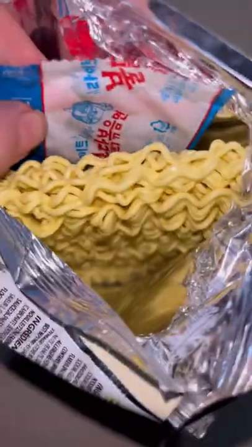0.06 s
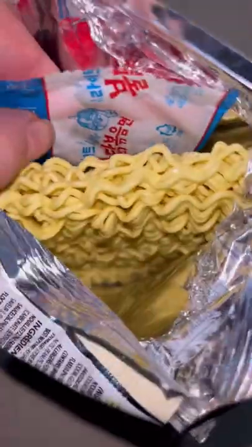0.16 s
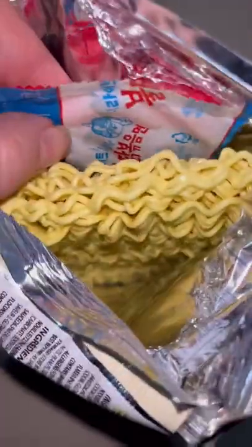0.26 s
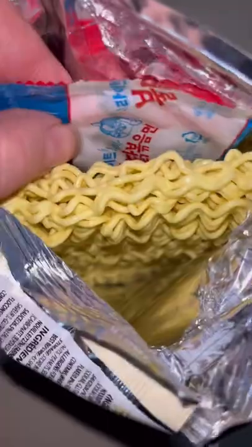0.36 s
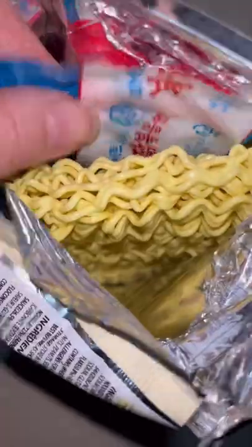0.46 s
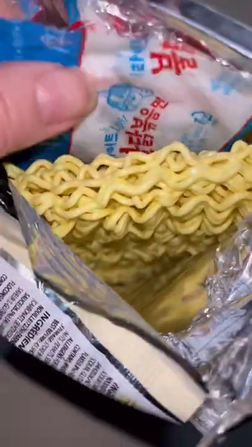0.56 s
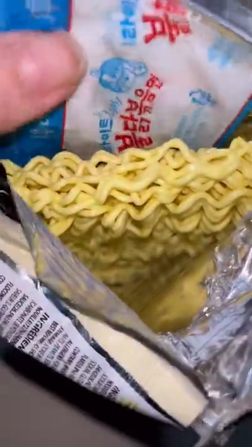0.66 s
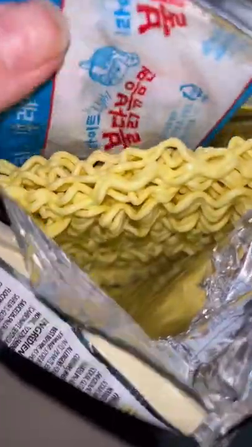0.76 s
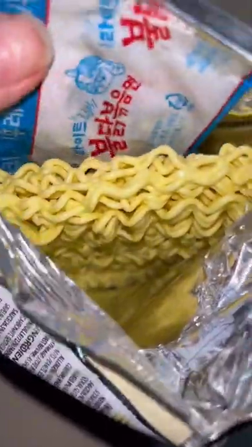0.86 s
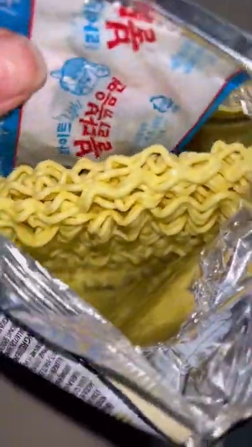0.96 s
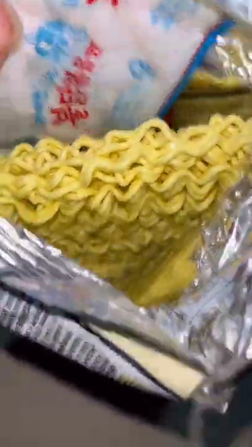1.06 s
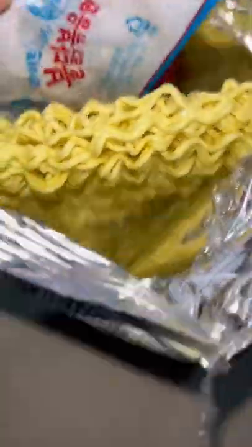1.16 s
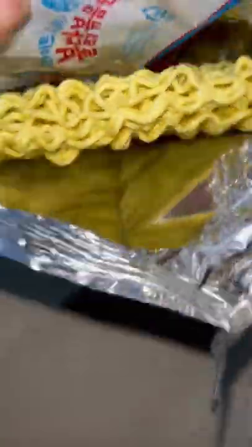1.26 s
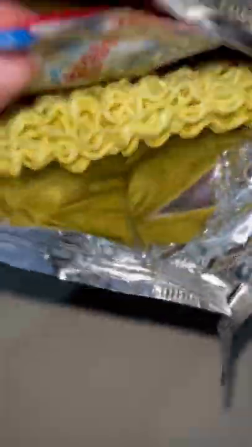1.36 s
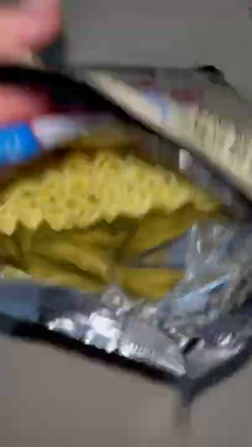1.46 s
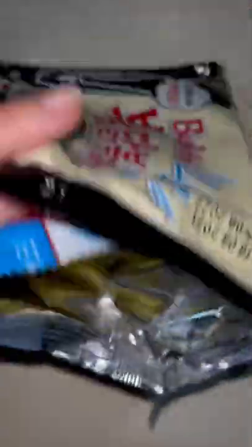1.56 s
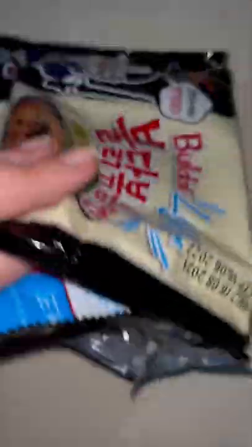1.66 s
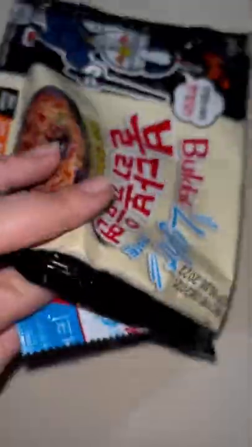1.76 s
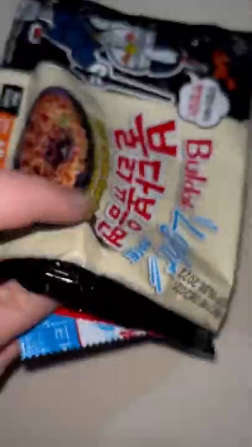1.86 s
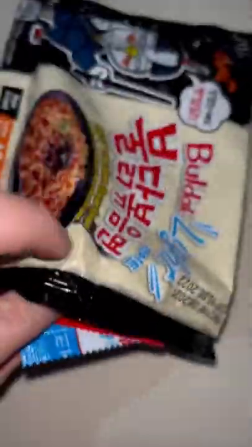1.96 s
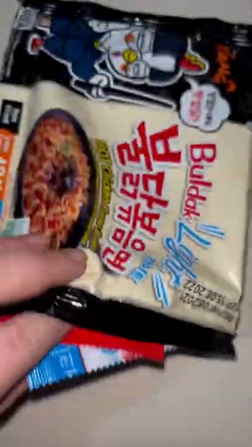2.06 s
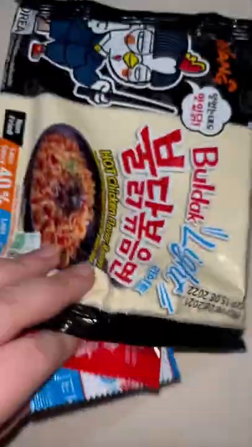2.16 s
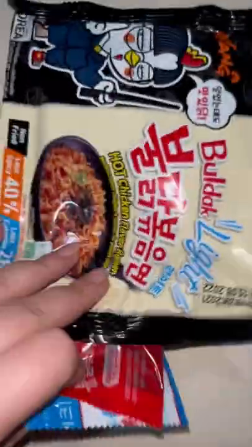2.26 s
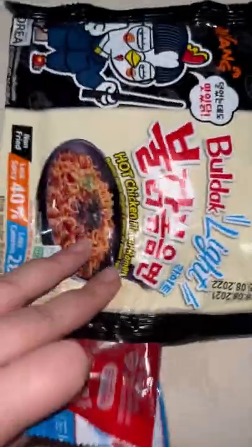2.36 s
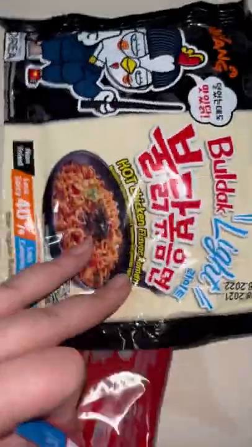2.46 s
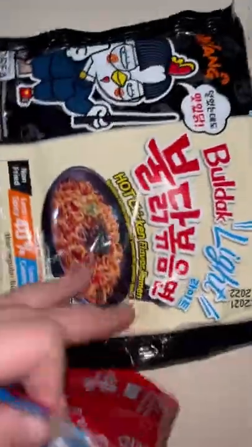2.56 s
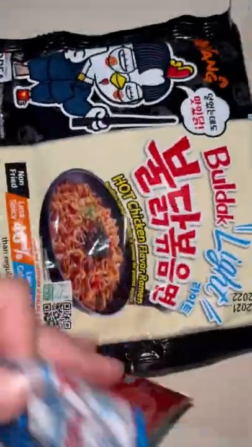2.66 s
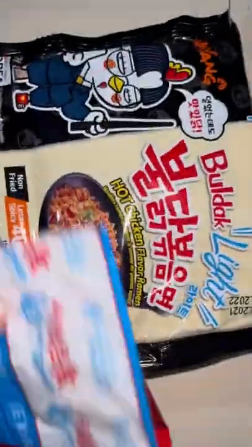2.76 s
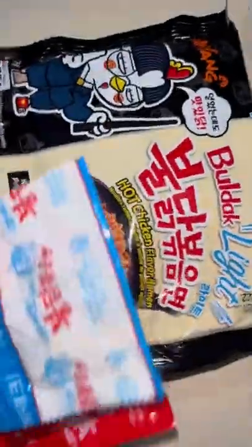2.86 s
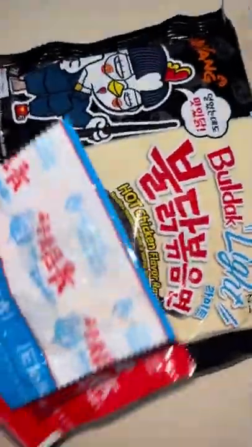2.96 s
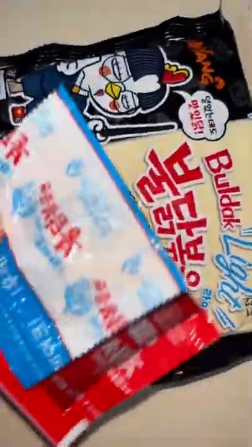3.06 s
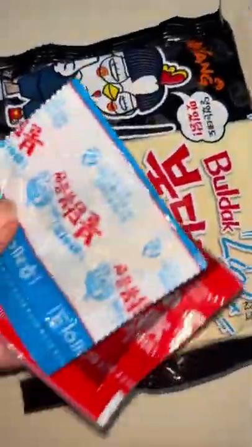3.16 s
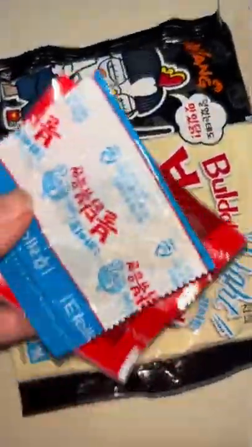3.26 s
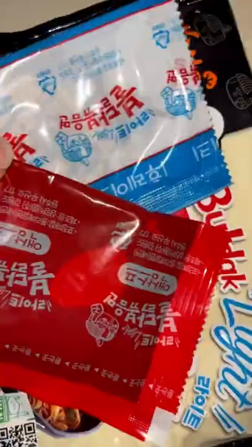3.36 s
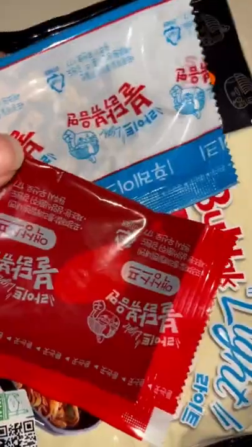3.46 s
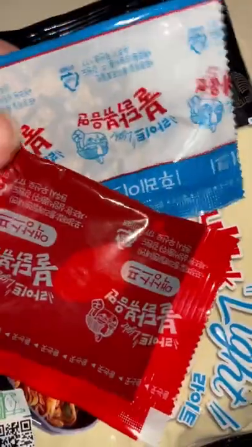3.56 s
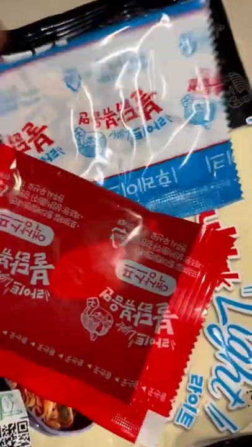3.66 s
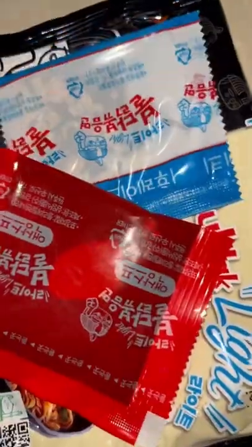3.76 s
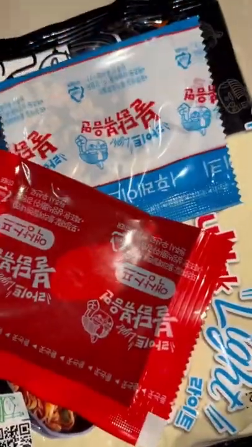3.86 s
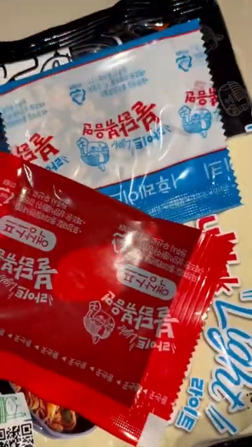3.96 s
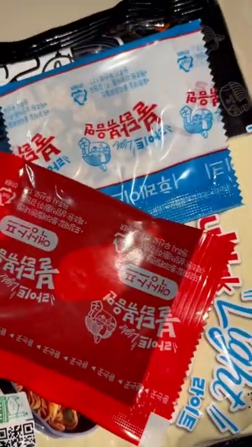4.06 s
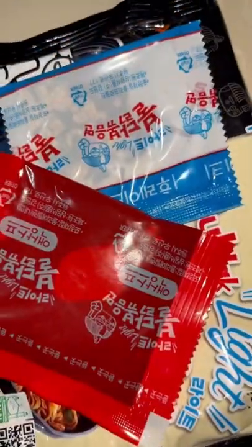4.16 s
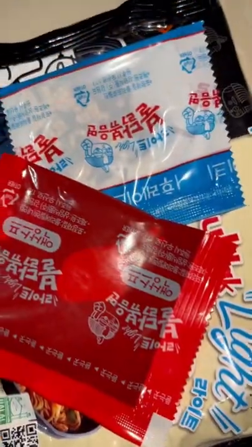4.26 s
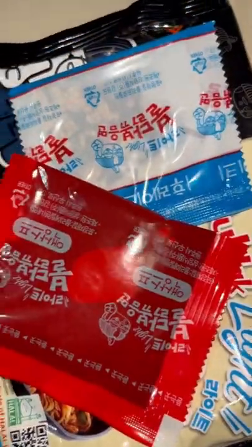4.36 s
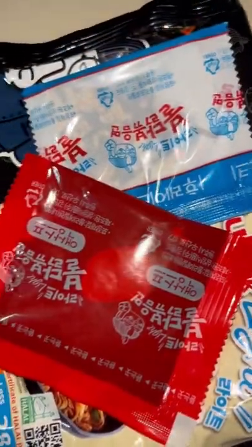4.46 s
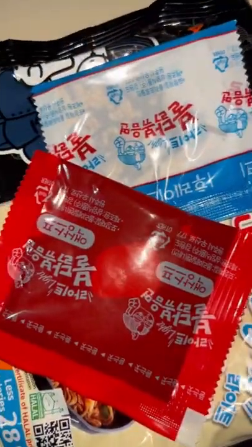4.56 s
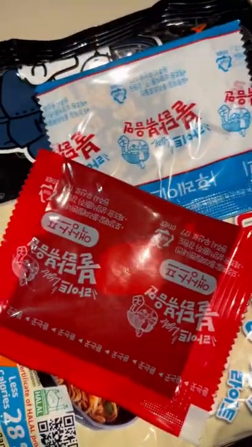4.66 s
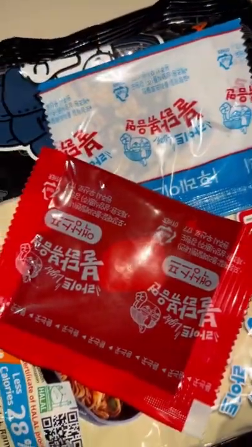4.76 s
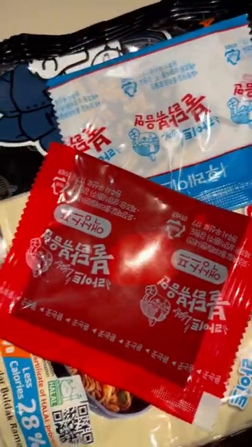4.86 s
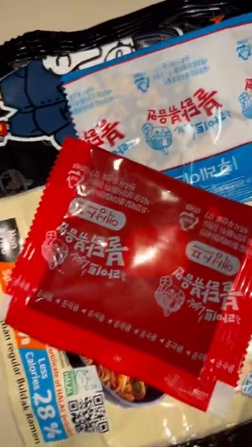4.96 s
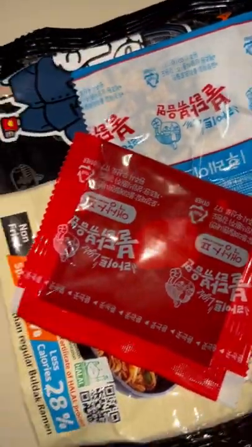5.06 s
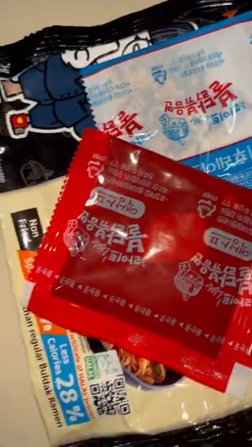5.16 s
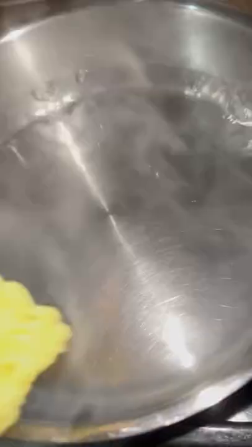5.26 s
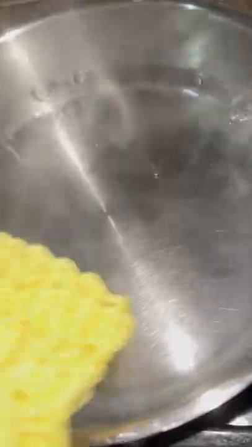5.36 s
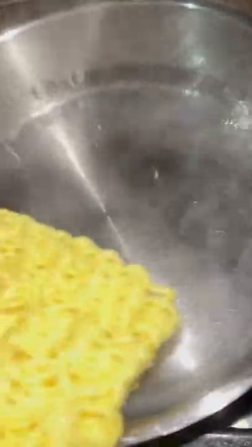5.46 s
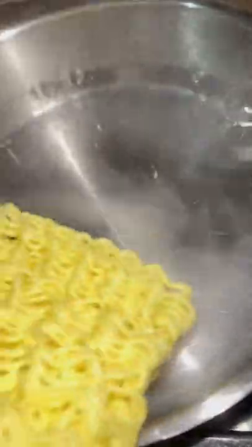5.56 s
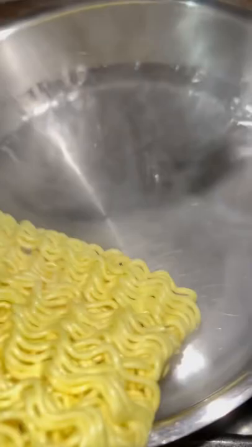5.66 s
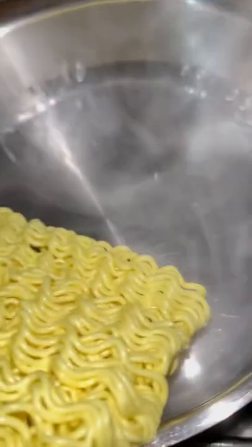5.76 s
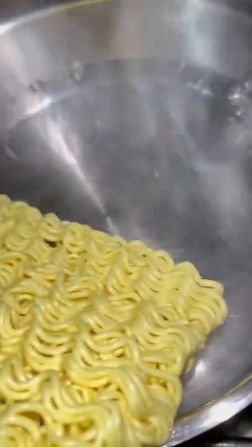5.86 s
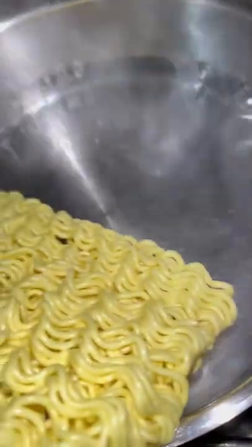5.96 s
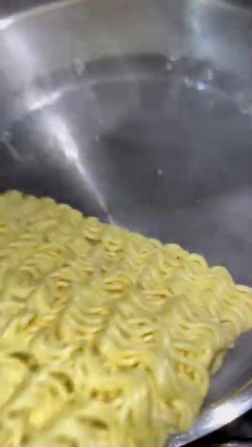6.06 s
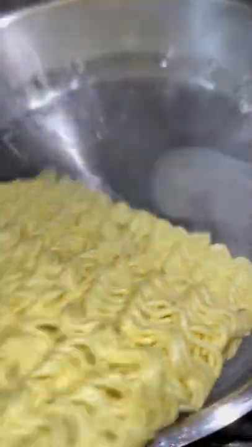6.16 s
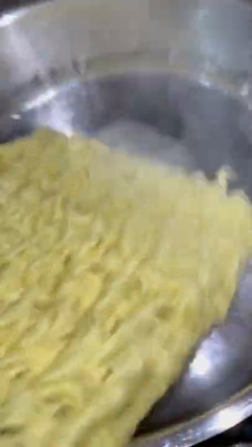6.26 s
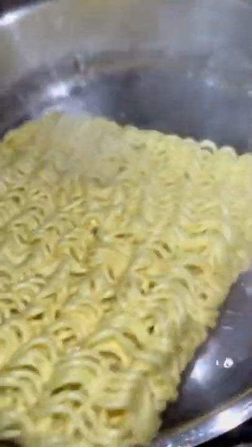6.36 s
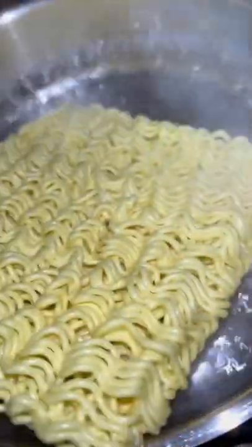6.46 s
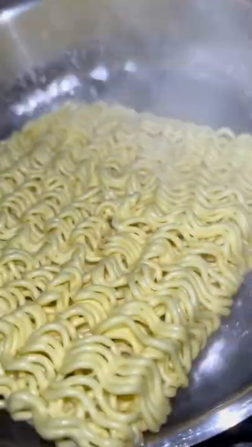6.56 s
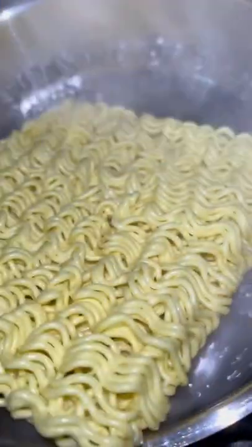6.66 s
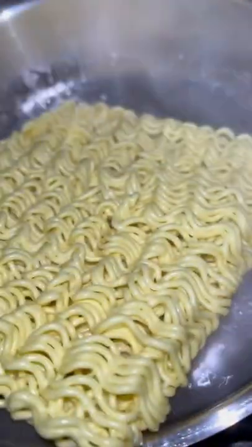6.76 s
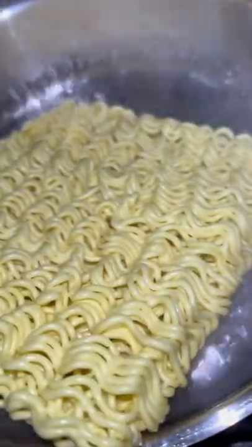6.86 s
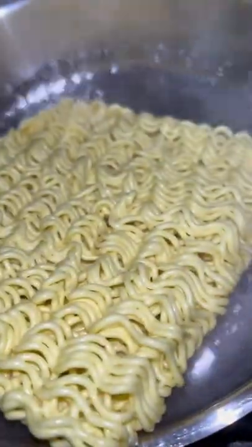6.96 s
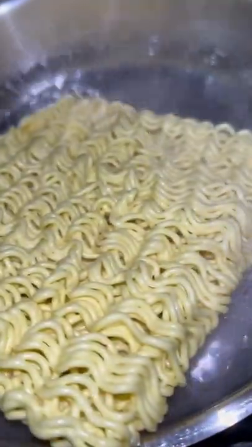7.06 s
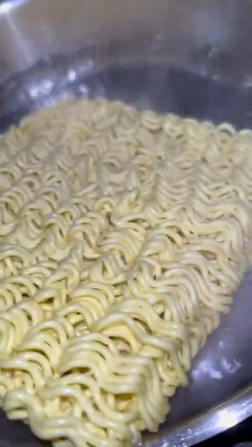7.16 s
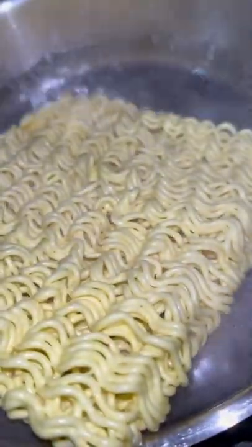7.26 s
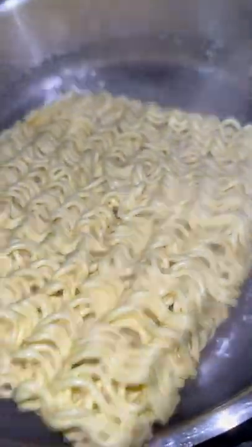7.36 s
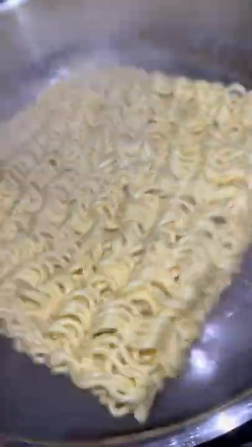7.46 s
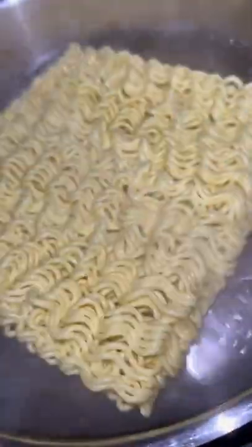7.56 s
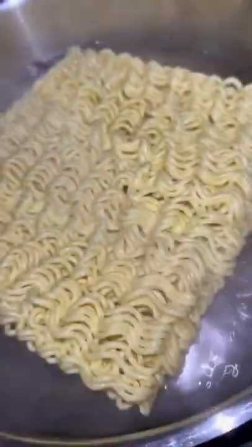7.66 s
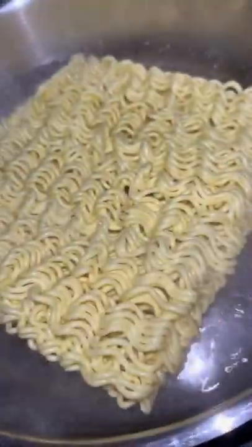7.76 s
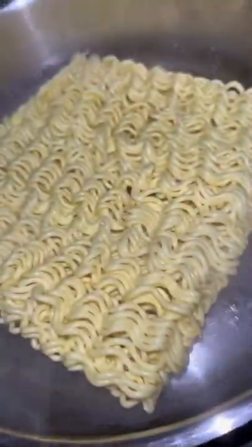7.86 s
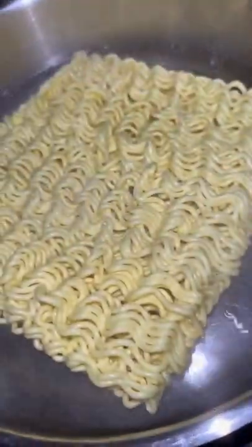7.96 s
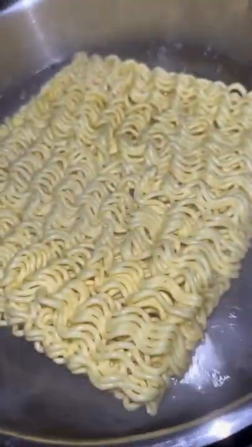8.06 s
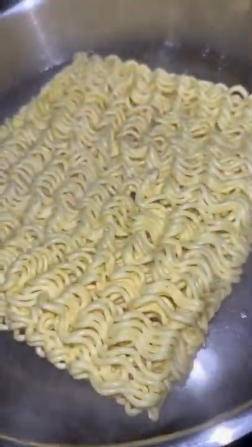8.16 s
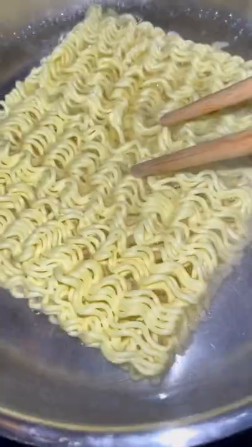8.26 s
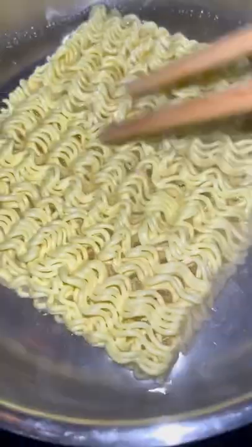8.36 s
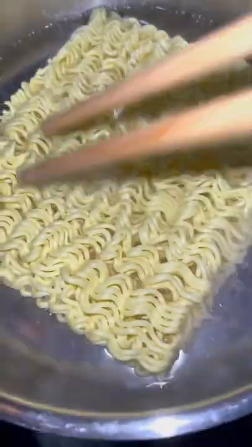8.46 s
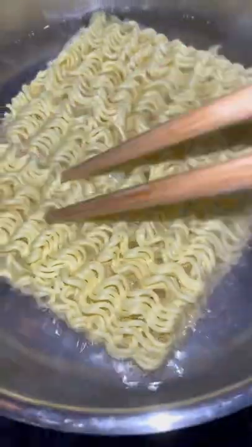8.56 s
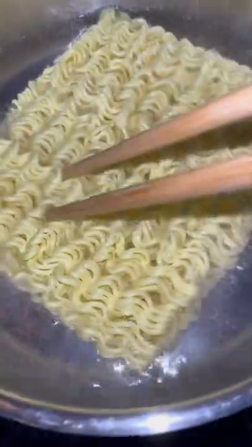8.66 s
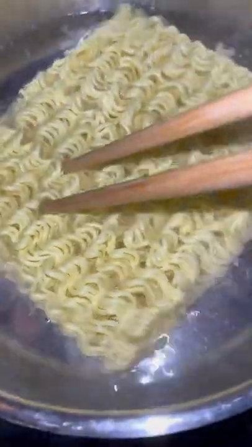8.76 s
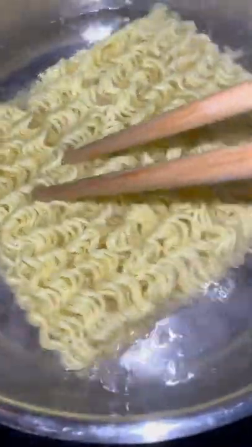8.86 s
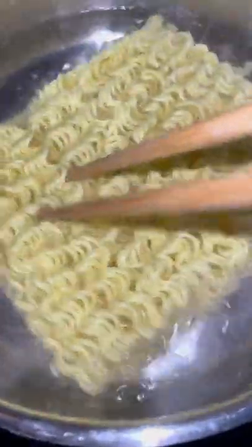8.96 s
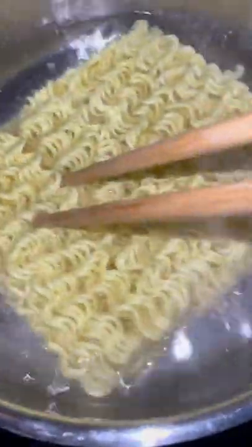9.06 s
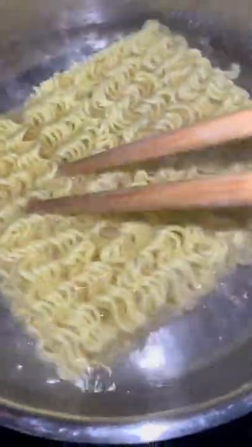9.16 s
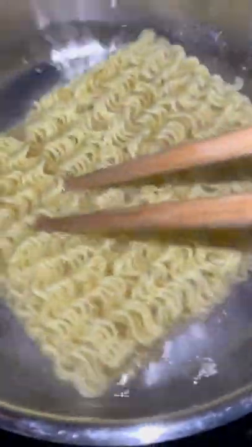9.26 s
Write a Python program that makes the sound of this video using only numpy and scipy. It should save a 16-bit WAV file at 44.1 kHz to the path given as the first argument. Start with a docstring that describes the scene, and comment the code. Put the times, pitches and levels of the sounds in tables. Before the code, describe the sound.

A foil-plastic packet crackles and snaps close up, goes quiet, then abruptly a pot simmers, noodles bump the steel, water sizzles and wooden chopsticks click.

```python
"""A foil-plastic noodle packet is handled close to the microphones: the film snaps, crackles and flexes,
and two sachets are dropped on it. Then, abruptly, a steel pot simmers on a gas ring: the noodle block is
pushed in and bumps the pot, water sizzles on the hot wall, and wooden chopsticks click together.
Film and clicks are filtered grains and noise bursts, pot and bubbles decaying modes, flame and water
coloured noise; a small kitchen answers, and two microphone ports hear it with a phase difference."""
import sys
import numpy as np
from scipy import signal
from scipy.fft import rfft, irfft, next_fast_len
from scipy.io import wavfile

SR = 44100
rng = np.random.default_rng(int(sys.argv[2]) if len(sys.argv) > 2 else 0)


def file_out(sig):
    """Save sig as 16-bit WAV at sys.argv[1]."""
    # one column per channel
    cols = np.atleast_2d(sig).T
    # limit, then scale
    lim = np.clip(cols, -1, 1)
    pcm = np.round(lim * 32767).astype(np.int16)
    wavfile.write(sys.argv[1], SR, pcm)


N = 411012
TIME = np.arange(N) / SR
STOVE_ON_S = 5.326

# Bright colour of the film, lent to every click too. Each row: frequency in Hz, relative level in dB per Hz.
FILM_FINE = [(1500, -28.5), (2800, 6.5), (3800, 1), (5300, 1), (7000, -6.5), (10000, 0.5), (12000, -11.5),
             (14000, -38), (16000, -32)]
# Lower colour of wider film facets popping. Each row: frequency in Hz, relative level in dB per Hz.
FILM_COARSE = [(350, -13.5), (650, 0.5), (1000, 3), (1800, -1.5), (2600, -2), (4000, -27.5)]
# Hiss of the simmering water. Each row: frequency in Hz, relative level in dB per Hz.
SIMMER_COLOUR = [(300, -5.5), (550, 0), (900, 2.5), (1300, 2), (1750, 2), (2200, -6), (3300, -3.5),
                 (5000, -5), (7000, -5), (10000, 1), (11500, -6), (13300, -36), (14500, -17), (15600, -9),
                 (16300, -45)]
# Modes of the filled pot: two of rocking, two booming, then the steel wall.
# Each row: nominal frequency in Hz, relative level in dB, 60 dB decay time in s.
POT_MODES = [(68.5, -4.5, .2), (100, -8, .15), (215.7, -4, .24), (278, -12, .2), (356, -13, 0.09),
             (485, -9, 0.11), (753, -3.5, 0.034), (913, -3, 0.08), (1135, -4, 0.085), (1350, -9, 0.09),
             (1740, -6, 0.049), (2100, -7, 0.045), (8210, -5.5, 0.056)]


def from_db(db):
    """Decibels as an amplitude gain."""
    return 10 ** (np.asarray(db) / 20)


def rms_one(x):
    """Scale a signal to an rms of 1."""
    return x / np.sqrt(np.mean(x ** 2) + 1e-20)


def add(track, s, sound):
    """Mix a sound in from time s."""
    start = max(round(s * SR), 0)
    track[start:start + len(sound)] += sound[:N - start]


def gains_in_time(rows):
    """Rows of (s, dB, ..): one interpolated gain curve per dB column."""
    s, *columns = np.transpose(rows)
    return [from_db(np.interp(TIME, s, c)) for c in columns]


def strokes(rows, attack_s, release_db_per_s):
    """Rows of (s, hold s, dB, ..): each swells, holds and dies away. One gain curve per dB column."""
    power = 0
    for s, hold, *levels in rows:
        swell = np.clip((TIME - s) / attack_s, 0, 1)
        release = from_db(-np.clip(release_db_per_s * (TIME - s - hold), 0, 120))
        power = power + np.outer(from_db(levels), swell * release) ** 2
    return np.sqrt(power)


def flicker(per_s, db):
    """A gain that wanders at random."""
    steps = rng.normal(0, db, int(per_s * N / SR) + 2)
    return from_db(np.interp(TIME * per_s, np.arange(len(steps)), steps))


def at_hz(points, hz):
    """Read a (Hz, dB) curve along a logarithmic frequency axis."""
    points = np.array(points)
    return np.interp(np.log(hz + 1), np.log(points[:, 0]), points[:, 1])


def coloured(x, spectrum):
    """Causal (minimum-phase) filter with the given spectrum; rms 1."""
    size = 2 * next_fast_len(len(x) // 2 + 1024)
    gain = from_db(at_hz(spectrum, np.fft.rfftfreq(size, 1 / SR)))
    # folding the cepstrum onto positive times makes the phase minimum
    cepstrum = irfft(np.log(gain))
    cepstrum[1:size // 2] *= 2
    cepstrum[size // 2 + 1:] = 0
    response = np.exp(rfft(cepstrum))
    return rms_one(irfft(rfft(x, size) * response)[:len(x)])


def resonate(x, hz, width_hz):
    """One resonance: two poles, with zeros at the bottom and top of the band."""
    r = np.exp(-np.pi * width_hz / SR)
    return signal.lfilter([1, 0, -1], [1, -2 * r * np.cos(2 * np.pi * hz / SR), r * r], x)


def resonate_twice(x, hz, width_hz):
    """The same resonance two times over, for steeper skirts."""
    return resonate(resonate(x, hz, width_hz), hz, width_hz)


def grains(per_s, spread_db, hiss_db):
    """Random clicks of uneven size over a smooth hiss."""
    sizes = from_db(spread_db * np.minimum(rng.exponential(1, N), 4)) * rng.choice([-1, 1], N)
    struck = rng.random(N) < per_s / SR
    return rms_one(sizes * struck) + from_db(hiss_db) * rng.standard_normal(N)


def ticks(per_s, spread_db, width):
    """Tiny impulses in random clumps, each ringing briefly at one of 24 pitches."""
    count = int(per_s * N / SR)
    clump = np.sort(rng.uniform(0, N, count // 3 + 1))
    at = (clump[np.arange(count) // 3] + rng.exponential(.003 * SR, count)).astype(int) % N
    sizes = from_db(spread_db * np.minimum(rng.exponential(1, count), 3)) * rng.choice([-1, 1], count)
    pitches = np.geomspace(600, 12500, 24)
    dealt = rng.integers(0, len(pitches), count)
    out = np.zeros(N)
    faint = 1e-12 * (np.arange(N) % 64 == 0)   # keeps the filters from falling fully silent
    for k, hz in enumerate(pitches):
        own = np.bincount(at[dealt == k], sizes[dealt == k], N)
        out += np.sqrt(hz) * rms_one(resonate(own + faint, hz, width * hz))
    return rms_one(out)


def burst(t60, tail_db, tail_t60):
    """A shiver of noise that builds in about a millisecond and leaves a weaker, longer tail."""
    t = TIME[:SR // 10]
    rise = 1 - np.exp(-(t / .0006) ** 2)
    decay = from_db(-60 * t / t60) + from_db(tail_db - 60 * t / tail_t60)
    return rng.standard_normal(len(t)) * rise * decay


def clicks(rows, crack_t60, pop_t60, crack_width, pop_width, tail_db, tail_t60,
           ring_share, skim_share, bend):
    """Each click is a bright crack with a brief ring, a lower pop, and a dull body as far as it is bent.

    Crack and pop levels are set on the first 5 ms, ahead of the high-pass."""
    ring_t60, ring_spread_oct = .0045, .25
    skim_s = (.0003, .0011)   # delay range of the first reflection off a surface close by
    facet_cut = .58   # a facet radiates little below this share of its pop pitch
    out, head, t = np.zeros(N), SR // 200, TIME[:SR // 10]
    for s, crack_db, crack_hz, pop_db, pop_hz in rows:
        crack = resonate(burst(crack_t60, tail_db, tail_t60), crack_hz, crack_width * crack_hz)
        crack = coloured(crack, FILM_FINE)
        ring_hz = min(crack_hz * 2 ** rng.normal(0, ring_spread_oct), 9500)
        ring = np.sin(2 * np.pi * ring_hz * t) * from_db(-60 * t / ring_t60)
        ring *= 1 - np.exp(-(t / .0004) ** 2)
        # the first instant spans all pitches
        edge = from_db(-16) * rms_one(burst(crack_t60 / 2, tail_db, tail_t60))
        crack = crack + ring_share * coloured(ring, FILM_FINE) + edge
        crack += skim_share * np.roll(crack, int(rng.uniform(*skim_s) * SR))

        pop = resonate_twice(burst(pop_t60, tail_db, tail_t60), pop_hz, pop_width * pop_hz)
        pop = coloured(pop, FILM_COARSE)

        facet = from_db(crack_db) * crack / np.std(crack[:head])
        facet = facet + from_db(pop_db) * pop / np.std(pop[:head])
        high_pass = signal.butter(4, facet_cut * pop_hz, "high", fs=SR, output="sos")
        facet = signal.sosfilt(high_pass, facet)

        body = coloured(resonate(burst(pop_t60, tail_db, tail_t60), hz=650, width_hz=530), FILM_COARSE)
        body_gain = min(bend[int(s * SR) + head], 1) ** 2 * from_db(pop_db - 6.0)
        add(out, s, facet + body_gain * body / np.std(body[:head]))
    return out


def plops(rows, t60, climb):
    """A bursting bubble rings and rises in pitch."""
    out, t = np.zeros(N), TIME[:SR // 10]
    for s, db, hz in rows:
        rising = np.sin(2 * np.pi * hz * t * (1 + climb * t / t60))
        add(out, s, from_db(db - 60 * t / t60) * rising)
    return out


def room_tone():
    """The quiet room: steady noise, strongest in the bass."""
    # Colour of the room. Each row: frequency in Hz, relative level in dB per Hz.
    room_colour = [(25, -21), (70, -1), (140, -4.5), (210, 0), (300, -13), (450, -25), (1000, -30),
                   (1700, -25), (2100, -37), (3300, -36), (6500, -36), (10500, -32), (12500, -49),
                   (16000, -58.5)]
    return from_db(-63.5) * coloured(rng.standard_normal(N), room_colour)


def burner():
    """A steady gas flame: low, turbulent noise."""
    # Colour of the roar. Each row: frequency in Hz, relative level in dB per Hz.
    flame_colour = [(25, -22), (50, -8.5), (75, -7.5), (105, 4), (145, -11.5), (210, -7), (245, -10),
                    (282, -5), (330, -20.5), (480, -23), (700, -67.5)]
    return from_db(-43.5) * coloured(rng.standard_normal(N), flame_colour)


def simmering(fizz):
    """Tiny bubbles on the pot floor ring over a smooth hiss."""
    surge = flicker(per_s=25, db=3)   # the bubbles come in uneven waves
    hiss = coloured(from_db(-3.5) * fizz * surge + rng.standard_normal(N), SIMMER_COLOUR)
    # the wetted block seeds more bubbles
    return hiss * from_db(np.interp(TIME, [5.9, 6.7], [-54, -51]))


def sizzling(fizz):
    """Water flashing off the hot wall: swells of dense grains and fizz."""
    # Swells of steam. Each row: peak time in s, level in dB, rise scale in s, fall scale in s.
    swells = [(5.525, -56, 0.0075, .028), (6.27, -40.5, 0.071, 0.052), (6.461, -24, 0.046, 0.076),
              (6.621, -51, 0.0087, 0.26), (7.601, -44.5, 0.09, 0.078), (8.935, -44.5, 0.03, 0.015),
              (9.208, -34, 0.025, 0.055)]
    # Colour of the sizzle. Each row: frequency in Hz, relative level in dB per Hz.
    sizzle_colour = [(500, -11.5), (900, -2), (1300, 2), (1900, -5.5), (2600, 5), (4000, 0), (7000, -2.5),
                     (10000, 4), (11500, -3.5), (13300, -27), (14100, -31), (15600, -4), (16300, -21)]
    flash = np.zeros(N)
    for s, db, rise, fall in swells:
        flash += from_db(db) / np.cosh((TIME - s) / np.where(TIME < s, rise, fall)) ** 2
    spray = grains(per_s=8200, spread_db=3.5, hiss_db=-3.0)
    return flash * coloured(spray + from_db(-7.5) * fizz, sizzle_colour)


def bubbles():
    """Bubbles burst at the surface, and a string of small ones escapes at the edge of the block."""
    # Single bursts. Each row: start in s, peak level in dB, starting pitch in Hz.
    surface = [(5.544, -42, 1880), (6.82, -34, 1660), (6.99, -35.5, 940), (5.698, -38, 2000),
               (6.9, -31, 1600)]
    # Small bubbles escaping one by one. Each row: start in s, peak level in dB.
    escaping = [(7.97, -39), (8.006, -38), (8.044, -39), (8.080, -37), (8.136, -39), (8.170, -35),
                (8.200, -34), (8.232, -33), (8.3575, -41)]
    flurry = [(s, db, 4970 * rng.uniform(0.95, 1.075)) for s, db in escaping]   # pitch in Hz
    return plops(flurry, t60=0.011, climb=.06) + plops(surface, t60=0.012, climb=0.066)


def pot_clicks():
    """Brittle noodles, spitting droplets and chopsticks: very short cracks with a lower pop."""
    # Sharp clicks. Each row: start in s, crack level in dB, crack pitch in Hz, pop level in dB, pop pitch in Hz.
    sticks = [(5.402, -51.5, 5000, -61, 1800), (5.438, -53, 7450, -59, 2400), (5.584, -62, 8700, -54, 1750),
              (6.103, -39, 6950, -42, 1840), (6.177, -34, 5900, -44, 1600), (6.795, -46, 8540, -51, 1440),
              (7.673, -44.5, 6230, -49, 2400), (8.474, -48.5, 8600, -67, 1440),
              (8.572, -28, 6700, -40, 2270), (8.5764, -24, 7000, -31.5, 2190),
              (8.5823, -40, 6210.0, -34, 795), (8.6199, -19, 8530, -33.5, 1420),
              (8.7015, -41, 8500, -64, 1380.0)]
    return clicks(sticks, crack_t60=0.0013, pop_t60=0.0062, crack_width=0.5, pop_width=1.0,
                  tail_db=-34, tail_t60=0.018, ring_share=0.24, skim_share=0, bend=np.ones(N))


def stirring():
    """The shifting block rocks the pot on its grate, sloshes an uneven boom and keeps the steel trembling."""
    # Pushes of the block. Each row: start in s, hold in s, then rocking, booming and trembling level in dB,
    # ahead of each layer's trim.
    pushes = [(5.7, 0.14, -38.5, -46.5, -44), (5.88, 0.16, -35, -52, -52),
              (6.08, 0.21, -34.5, -37.5, -37.5), (6.21, 0.19, -29.5, -35, -37.5),
              (6.44, 0.076, -33.5, -33, -36), (7.55, 0.11, -39, -35.5, -51), (8.58, 0.043, -34, -49, -66)]
    # the simmer alone moves the pot this much: rocking, booming, trembling
    idle = from_db([[-53], [-63], [-63]])
    pushed = strokes(pushes, attack_s=0.0215, release_db_per_s=99)
    rocking, booming, trembling = np.hypot(pushed, idle)
    push = grains(per_s=900, spread_db=5.0, hiss_db=-7.5)
    rock = rms_one(resonate_twice(push, hz=70, width_hz=46))
    boom, steel = np.zeros(N), np.zeros(N)
    for hz, db, _ in POT_MODES[2:4]:
        boom += from_db(db) * rms_one(resonate_twice(push, hz, 0.17 * hz))
    for hz, db, t60 in POT_MODES[4:]:
        mode = rms_one(resonate(push, hz, 1.5 / t60 + 0.035 * hz))
        steel += from_db(db) * mode * (hz / 1000) ** -.45
    rock_layer = from_db(-2.5) * rocking * rock
    steel_layer = from_db(-8.0) * trembling * rms_one(steel)
    return rock_layer + booming * rms_one(boom) + steel_layer


def bumps():
    """Each bump rocks the pot on its grate, makes it boom, and drags the brittle block over the steel."""
    # The block bumping the pot. Each row: start in s, then knock, scratch, thump and boom level in dB,
    # ahead of the trims and each mode's own level.
    contacts = [(5.697, -33.5, -52, -45, -51), (5.745, -32, -45, -40, -44), (5.805, -26.5, -52, -42, -45),
                (5.859, -34, -44.5, -36, -38), (6.114, -22, -43.5, -20, -22), (6.175, -24.5, -33, -36, -32),
                (6.227, -11, -31.5, -36, -35), (6.24, -20, -40, -13.5, -16.5), (6.260, -13, -38, -30, -30),
                (6.289, -9.5, -32, -22, -22), (6.303, -30, -42, -36, -15), (6.318, -17.5, -48, -36, -36),
                (6.373, -17.5, -32, -26, -31), (7.529, -18.5, -41, -23, -35),
                (7.538, -19.5, -33.5, -34, -35), (7.561, -23, -60, -21, -19.5)]
    detune, contact_spread_db = .018, 2   # pitch and strength vary from bump to bump
    out, t = np.zeros(N), TIME[:SR // 2]
    grit = grains(per_s=900, spread_db=5, hiss_db=-8)
    for s, knock_db, scratch_db, thump_db, boom_db in contacts:
        for k, (hz, db, t60) in enumerate(POT_MODES):
            hz = hz * (1 + rng.normal(0, detune))
            db = db + rng.normal(0, contact_spread_db)
            if k < 4:
                level = thump_db if k < 2 else boom_db
                ring = from_db(level) * np.sin(2 * np.pi * hz * t)
            else:   # the upper modes are rough: narrow noise
                rough = rms_one(resonate(rng.standard_normal(len(t)), hz, 0.039 * hz))
                ring = from_db(knock_db - 12.5) * rough
            add(out, s, ring * from_db(db - 60 * t / t60) * (1 - np.exp(-t * hz)))
        scratch = grit[int(s * SR):][:len(t)] * from_db(-60 * t / 0.065)
        add(out, s, from_db(scratch_db - 17.5) * coloured(scratch, FILM_FINE))
    return out


def stove():
    """The gas ring and the pot on it, silent until the scene changes to them."""
    fizz = ticks(per_s=3000, spread_db=5.0, width=0.036)
    water = simmering(fizz) + sizzling(fizz) + bubbles()
    start = np.clip((TIME - STOVE_ON_S) / 0.00099, 0, 1)
    return (burner() + water + stirring() + bumps() + pot_clicks()) * start


def buckles():
    """Panels buckle: bending waves arrive high part first, so each falls in pitch; then the panel flutters."""
    # Panels of the bag. Each row: start in s, level in dB ahead of radiation and trim,
    # reference pitch in Hz, flutter 60 dB decay in s.
    panels = [(0.042, -32, 360, 0.079), (.06, -25.5, 81, 0.2), (.25, -36, 322, 0.065),
              (0.344, -32.5, 238, 0.14), (0.413, -21.5, 191, 0.075), (0.643, -34, 325, 0.12),
              (0.661, -29, 160, 0.081), (.696, -29, 244.5, 0.19), (0.877, -40.5, 454, 0.13),
              (1.048, -31, 467, 0.089), (1.106, -24.5, 331, 0.085), (1.146, -31.5, 453, 0.22),
              (1.167, -20, 86.3, 0.2), (1.362, -29, 211, 0.065), (1.469, -32, 590, 0.22),
              (1.491, -25, 150, 0.12), (1.511, -25.5, 260, 0.17), (1.894, -31, 138, 0.099),
              (2.101, -17.5, 453, 0.076), (2.766, -36, 335, 0.3), (2.95, -33.5, 265, 0.36),
              (3.544, -40, 724, 0.059), (3.633, -33, 299, 0.094), (3.697, -36, 303, 0.19),
              (3.744, -30.5, 150, .12)]
    out, t = np.zeros(N), TIME[:SR // 4]
    for s, db, hz, t60 in panels:
        pitch = hz * 1.507 / np.sqrt(1 + t / .004)
        wave = np.sin(2 * np.pi * np.cumsum(pitch) / SR) * from_db(-60 * t / 0.045)
        flutter = rms_one(resonate_twice(rng.standard_normal(len(t)), 0.5 * hz, hz))
        flutter = flutter * from_db(-7.5 - 60 * t / t60)
        radiated = hz / np.hypot(hz, 170)   # the longest waves radiate poorly
        onset = 1 - np.exp(-t / 0.00043)
        add(out, s, radiated * from_db(db) * (wave + flutter) * onset)
    return out


def creases():
    """Crack and pop of every snap: the more body a crease has, the lower its crack."""
    # Creases snapping through. Each row: start in s, crack level in dB ahead of the trim,
    # body in dB (how far the pop stands over the crack), pop pitch in Hz.
    folds = [(0.0403, -42.5, 6, 2300), (0.079, -31.5, -10.5, 2730), (0.0944, -36, -10.5, 2674),
             (0.1856, -15, -3.5, 2260), (0.3972, -34.5, -6.5, 750), (0.411, -23, -14, 1728),
             (0.4975, -33.5, -10.5, 1900), (0.5046, -29, -17, 1390), (0.56, -51.5, 9, 1570),
             (0.6013, -37.5, -19.5, 2383), (0.6322, -31.5, -22.5, 2560), (0.6421, -32, -6.5, 1230),
             (0.6947, -27, -15.5, 1670), (0.8026, -34, -21, 2410), (0.916, -22.5, -11.5, 1010),
             (.9756, -32.5, -25.5, 2623), (1.047, -31, 1.5, 2560), (1.0534, -31.5, -12.5, 1658),
             (1.07, -35.5, -23, 2250), (1.0905, -29, -13.5, 1950), (1.1457, -23.5, -6.5, 1492),
             (1.186, -50, 10, 910), (1.2566, -33, -9.5, 2300), (1.358, -29, -4.5, 1865),
             (1.4665, -20.5, -7.5, 2220), (1.534, -49, 7.5, 1260), (1.676, -38, -2, 2140),
             (1.6838, -29, -0.5, 2500), (1.7558, -35.5, -7.5, 1199), (1.79, -34.5, 0.5, 1268),
             (1.89, -29, -6, 1996), (1.937, -40, -5, 2550), (2.014, -40, 2, 2304), (2.022, -35, -4, 2060),
             (2.0442, -26, -9.5, 1560), (2.057, -30.5, -3, 1188), (2.1003, -20.5, -0.5, 1368),
             (2.1592, -23.5, -8.5, 1620), (2.201, -34, -3.5, 1746), (2.2274, -25.5, -9.5, 1687),
             (2.2884, -23, -13, 2230), (2.2972, -21, -13.5, 1612), (2.309, -30, -4.5, 2090),
             (2.3738, -21, -14.5, 2226), (2.3963, -20.5, -11.5, 2014), (2.425, -40, 9.5, 1483),
             (2.4342, -22, -1.5, 1756), (2.458, -46, 9.5, 1627), (2.479, -21, -9, 2113),
             (2.564, -32.5, 2, 1767), (2.5753, -33, -9, 1676), (2.6972, -38.5, 6.5, 1750),
             (2.7045, -32.5, -3, 1585), (2.731, -33.5, -16, 2875), (2.755, -37, -5.5, 1800),
             (2.902, -50, 1, 1700), (2.914, -45, -4.5, 1943), (3.1847, -41.5, -5.5, 2580),
             (3.4902, -33.5, -10.5, 1680), (3.5434, -61.5, 28, 981), (3.564, -43, -4, 1670),
             (3.6302, -52, 15, 1360), (3.6336, -29.5, 1.5, 2950), (3.646, -51, 16, 1232),
             (3.6765, -41.5, 4, 1650), (3.695, -32.5, 0, 1253), (3.7316, -26, -4, 1270),
             (3.942, -51, 9.5, 1240), (4.229, -53.5, -17, 1664), (4.249, -60, -5.5, 2000),
             (4.3417, -43.5, 0, 1626), (4.403, -68, 7, 1390)]
    rows = []
    for s, db, body_db, pop_hz in folds:
        crack_hz = 4973 * 2 ** (-0.06 * body_db)
        rows.append((s, db, crack_hz, db + body_db, pop_hz))
    return rows


def packet():
    """Loud snaps, a spray of tiny creases under each grip, sliding film, and the soft flapping of the bag."""
    # The fingers squeeze, hold and let go. Each row: start in s, hold in s,
    # then fine crackle, coarse crackle and bending level in dB, ahead of each layer's trim.
    grips = [(.188, 0.061, -42, -48.5, -61), (.385, 0.022, -56, -64, -43.5), (.48, 0.052, -50.5, -57, -55),
             (.64, 0.0091, -40.5, -43, -44.5), (.693, 0.015, -39.5, -43, -38),
             (1.04, 0.043, -38.5, -54, -44.5), (1.147, 0.011, -41, -32.5, -36),
             (1.453, 0.013, -40.5, -46, -56), (1.467, 0.014, -34, -37.5, -44),
             (1.49, 0.018, -52, -40.5, -34), (1.675, 0.17, -48, -47, -60.5), (1.86, 0.041, -47.5, -49, -49),
             (2.038, 0.028, -29.5, -35, -43.5), (2.1, 0.085, -42, -40, -45), (2.19, 0.078, -43, -40.5, -51),
             (2.385, 0.083, -42, -38, -54.5), (2.287, 0.0039, -31, -39, -44),
             (2.467, 0.013, -26, -31, -47.5), (2.52, 0.048, -36.5, -40.5, -45),
             (2.703, 0.037, -39.5, -47, -53.5), (2.755, 0.013, -64, -53, -41.5),
             (2.895, 0.013, -52, -45.5, -52), (2.95, 0.035, -85, -78, -52), (3.485, 0.0087, -54, -45, -58),
             (3.634, 0.0087, -47, -39, -49), (3.695, 0.027, -37, -38.5, -50.5)]
    # Light sliding between grips, until the sachets are put down. Each row: time in s,
    # then fine hiss, coarse rub and bending level in dB; trims follow on the last two.
    slides = [(0, -54.5, -59.5, -57.5), (.35, -61, -58, -60.5), (.7, -59.5, -55.5, -56.5),
              (.85, -64.5, -63.5, -59), (1.1, -49.5, -49, -48), (1.42, -67.5, -69, -62),
              (1.6, -52, -53, -48), (1.99, -63, -57, -58), (2.3, -46.5, -46.5, -55.5),
              (2.67, -57, -51.5, -56.5), (2.93, -59, -62, -63), (3.05, -73.5, -76, -72.5),
              (3.29, -59.5, -69, -66), (3.37, -64, -60.5, -66), (3.62, -56.5, -52, -63.5),
              (3.9, -86, -82, -72.5), (4.1, -100, -100, -100)]
    # Colour of the flapping bag. Each row: frequency in Hz, relative level in dB per Hz.
    bag_colour = [(25, -23), (60, -1.5), (110, -0.5), (160, -4), (240, 0), (330, -3.5), (500, -4.5),
                  (750, -18.5), (1400, -44.5)]
    full_bend_db = -48.5   # the bag's body speaks fully when bent this hard
    gripping = strokes(grips, attack_s=0.002, release_db_per_s=311.5)
    handling = gains_in_time(slides)
    _, coarse, flex = np.hypot(gripping, handling)

    ringing = ticks(per_s=1500, spread_db=5, width=.25)
    sharp = grains(per_s=280, spread_db=4.5, hiss_db=-8)
    popping = ticks(per_s=950, spread_db=5.2, width=.24)   # wider facets flipping over
    rubbing = from_db(-11) * rng.standard_normal(N)   # film sliding over film

    crackle = from_db(-1) * gripping[0] * coloured(1.1 * ringing + sharp, FILM_FINE)
    slide = rng.standard_normal(N) + from_db(-2) * sharp + from_db(-3) * ringing
    sliding = handling[0] * coloured(slide, FILM_FINE)
    crumple = from_db(-3.0) * coarse * coloured(popping + 0.6 * sharp + rubbing, FILM_COARSE)
    flapping = coloured(grains(per_s=250, spread_db=3.5, hiss_db=-6), bag_colour)
    bag = from_db(0.5) * flex * flapping + from_db(2.0) * buckles()
    snaps = clicks(creases(), crack_t60=0.0033, pop_t60=0.0063, crack_width=0.93, pop_width=0.6,
                   tail_db=-25.0, tail_t60=0.032, ring_share=.65, skim_share=.45,
                   bend=flex / from_db(full_bend_db))
    return from_db(-0.62) * snaps + crackle + sliding + crumple + bag


def kitchen(x, t60, gap_s):
    """Diffuse reflections from walls and worktop: a decaying noise tail that builds over gap_s."""
    t = TIME[:SR // 2]
    tail = rng.standard_normal(len(t)) * from_db(-60 * t / t60) * (1 - np.exp(-t / gap_s))
    return signal.fftconvolve(x, tail / np.sqrt(np.sum(tail ** 2)))[:N]


def ports(x):
    """A near source reaches the two microphone ports with a phase difference that varies with frequency."""
    # The two ports. Each row: frequency in Hz, phase in radians by which left leads right.
    port_phase = [(20, 0), (250, -.3), (520, -.9), (1400, -.7), (2150, .9), (2650, 2.5), (3900, 1.6),
                  (5100, 1.7), (6000, 3.14), (7600, 5.9), (8500, 6.9), (10200, 9.42), (11000, 10.4),
                  (11800, 12.1), (13400, 12.9), (14500, 15.7), (17000, 16.3)]
    size = next_fast_len(N + SR // 10)
    lead = np.interp(np.fft.rfftfreq(size, 1 / SR), *np.transpose(port_phase))
    half_each_way = np.exp(.5j * lead * [[1], [-1]])
    return irfft(rfft(x, size) * half_each_way, size)[:, :N]


def scene():
    """Packet, then stove, close to the two ports in a small kitchen."""
    direct = room_tone() + stove() + packet()
    reflected = from_db(-17.5) * kitchen(direct, t60=0.16, gap_s=0.0049)
    near = ports(direct + reflected) * from_db([[-.3], [.3]])
    # close surfaces throw early reflections in from the sides, the walls later ones; the bass stays centred
    high_pass = signal.butter(1, 450, "high", fs=SR, output="sos")
    above_bass = signal.sosfilt(high_pass, direct)
    early = from_db(-15) * kitchen(above_bass, t60=.05, gap_s=.001)
    late = from_db(-20.0) * kitchen(above_bass, t60=.25, gap_s=.01)
    # bubbles all across the pot
    wide = from_db(-64) * coloured(rng.standard_normal(N), SIMMER_COLOUR) * (TIME > STOVE_ON_S)
    return near + (early + late + wide) * [[1], [-1]]


def record(dry):
    """The top is cut steeply above 16.3 kHz."""
    low_pass = signal.ellip(10, .1, 80, 16300, fs=SR, output="sos")
    return signal.sosfilt(low_pass, dry)


dry = scene()
out = record(dry)
file_out(out)
```